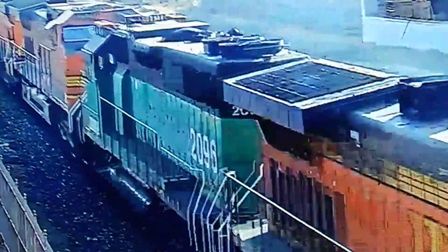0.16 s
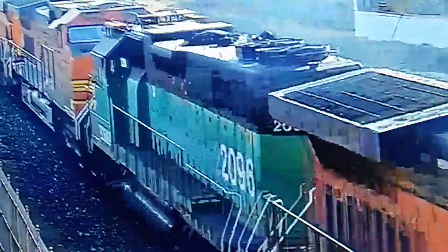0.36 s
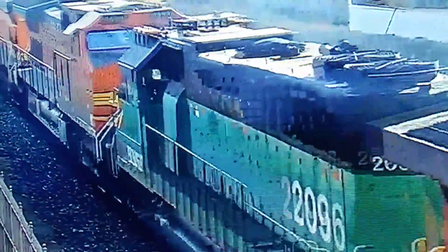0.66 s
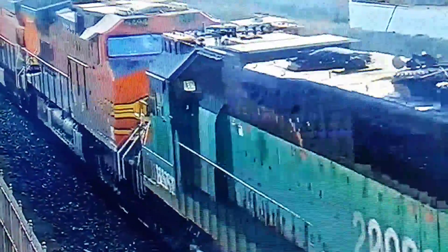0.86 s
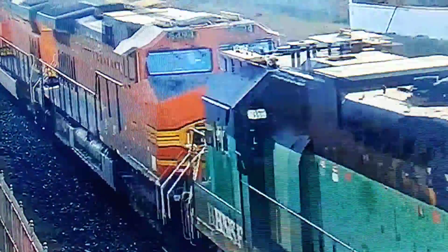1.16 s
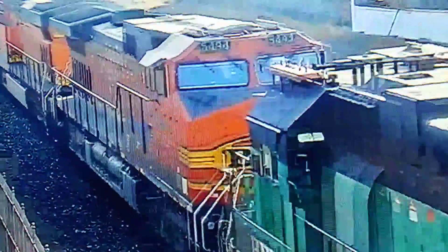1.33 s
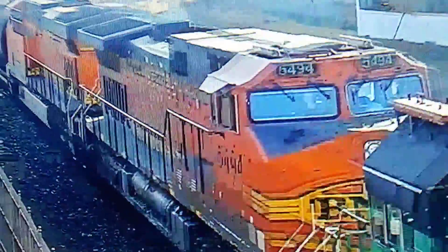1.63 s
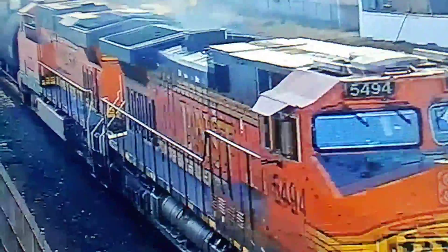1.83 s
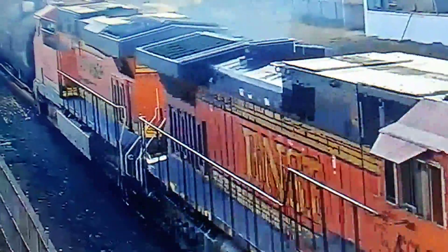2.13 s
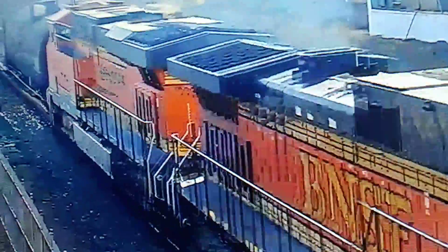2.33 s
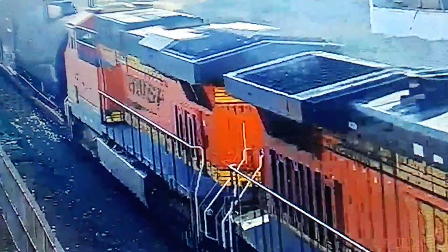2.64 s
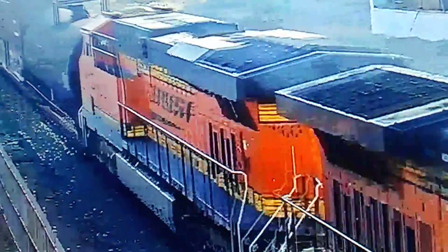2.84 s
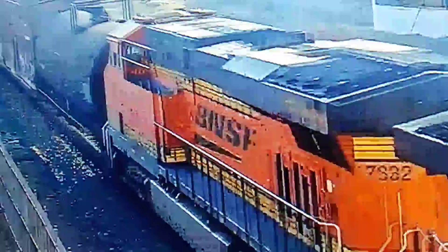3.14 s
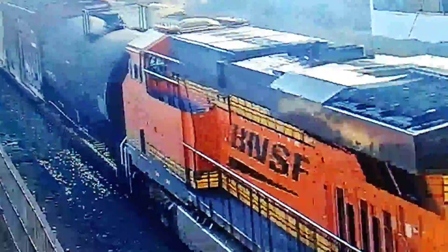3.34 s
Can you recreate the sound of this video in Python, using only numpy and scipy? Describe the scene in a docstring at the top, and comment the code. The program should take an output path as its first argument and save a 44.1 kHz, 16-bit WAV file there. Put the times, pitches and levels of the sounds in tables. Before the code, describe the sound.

Diesel locomotives roar and hiss steadily past as the last air horn echoes fade away

```python
"""The last echoes of an air horn die away while diesel locomotives roll past, heard through a small loudspeaker.
Exhaust rumble, engine roar, steel hiss and rattle are bands of noise; clanks are sudden bursts of the rattle.
The horn is a sum of sine waves with an airy rasp of noise. The loudspeaker's lack of bass is in the noise colours.
Cabinet and room lay narrow peaks, dips and echoes over the train noise; faint microphone noise lies below."""
import sys
import numpy as np
from scipy import signal
from scipy.fft import rfft, irfft
from scipy.io import wavfile

SR = 44100
rng = np.random.default_rng(int(sys.argv[2]) if len(sys.argv) > 2 else 0)


def put_to_file(sound):
    """Save the sound as 16-bit audio at rate SR, in the file named by the first command-line argument."""
    columns = np.atleast_2d(sound).T  # one column per channel
    safe = np.clip(columns, -1, 1)
    whole_steps = np.round(safe * 32767)
    wavfile.write(sys.argv[1], SR, whole_steps.astype(np.int16))


N = 153909   # length in samples

# How loud the passing train is, before the room is added. Each row: start in seconds, exhaust level in dB,
# engine roar level in dB, upper roar level in dB, steel hiss level in dB.
PASSING_LEVELS = [(0, -46, -36.5, -39, -44), (.2, -45, -39, -44, -48.5), (.4, -46.5, -41.5, -48, -48),
                  (.63, -46, -44.5, -49.5, -47), (.85, -45.5, -42, -44.5, -45),
                  (1.2, -46.5, -41.5, -47, -44), (1.5, -46, -41.5, -44.5, -43.5),
                  (1.72, -46.5, -42, -44.5, -44), (1.95, -47, -45, -46, -44.5),
                  (2.23, -47, -44, -49.5, -47), (2.7, -45, -43.5, -47.5, -47), (3.1, -45, -43, -48, -46),
                  (3.3, -46, -41, -47, -44.5), (3.49, -46, -40.5, -44.5, -43.5)]
# Colour of rattling steel and of the horn's rasp. Each row: frequency in Hz, relative strength in dB per Hz.
RATTLE_COLOUR = [(5000, 6.5), (7500, 7.5), (8300, 0), (9800, -4.5), (10400, -1.5), (10900, -5),
                 (11200, -18), (12600, -12), (13500, -20)]


def amp(db):
    """Turn decibels into a gain."""
    return 10 ** (np.asarray(db) / 20)


def rms_one(x):
    """Scale a signal so that its rms (average strength) is 1."""
    return x / np.sqrt(np.mean(x ** 2) + 1e-20)


def in_time(rows):
    """Join the rows of a table with straight lines: one curve per column, one value per sample."""
    seconds, *columns = np.transpose(rows)
    t = np.arange(N) / SR
    return [np.interp(t, seconds, column) for column in columns]


def drift(rate_hz):
    """Random wandering with rms 1: smoothed noise, made at every 40th sample and joined by lines."""
    step = 40
    r = np.exp(-2 * np.pi * rate_hz * step / SR)
    noise = rng.standard_normal(N // step + 2002)
    slow = signal.lfilter([1], [1, -2 * r, r * r], noise)[2000:]   # skip the filter's start
    return np.interp(np.arange(N) / step, np.arange(len(slow)), rms_one(slow))


def coloured(spectrum):
    """Noise with the given spectrum, practically silent outside it; rms 1."""
    hz, db = np.transpose(spectrum)
    grid = np.log(np.fft.rfftfreq(N, 1 / SR) + 1)   # the 1 avoids the log of zero
    gain = amp(np.interp(grid, np.log(hz), db, left=-150, right=-150))
    return rms_one(irfft(rfft(rng.standard_normal(N)) * gain, N))


def darken(roar):
    """The roar darkens with time: its lower part gains level and its upper part loses it."""
    split_hz, tilt_db_per_s = 990, 0.4
    t = np.arange(N) / SR
    spectrum = rfft(roar)
    spectrum[int(split_hz * N / SR):] = 0
    low = irfft(spectrum, N)
    tilt = amp(tilt_db_per_s * (t - t.mean()))
    return low * tilt + (roar - low) / tilt


def engines():
    """Four bands of noise that swell and throb together with the firing cycle, and flicker each alone."""
    # Colours as they leave the loudspeaker. Each row: frequency in Hz, relative strength in dB per Hz.
    exhaust_colour = [(100, -45.5), (160, -28), (232, -6.5), (290, -0.5), (380, -4.5), (440, -11.5),
                      (760, -14), (900, -65)]
    roar_colour = [(700, -23.5), (840, -4), (1070, 1), (1200, 0.5), (1320, 4), (1450, -18), (1600, -26)]
    upper_colour = [(1400, 4.5), (1680, -2), (2060, 3), (2400, -11.5), (3500, -16.5), (4000, -17)]
    hiss_colour = [(3500, -21), (4300, -0.5), (5000, 0.5), (6300, 3.5), (6700, 0.5), (7100, -5),
                   (7500, -21.5), (8200, -47)]
    chug_hz, chug_db = 16, 1.0   # throb of the firing cycle
    swell_hz, swell_db = 6.9, 0.6
    flicker_hz, flicker_db = 14, 0.9
    t = np.arange(N) / SR
    chug = np.sin(2 * np.pi * chug_hz * t + 1.66 * drift(1.0))   # the beat is slightly uneven
    together_db = swell_db * drift(swell_hz) + chug_db * chug
    exhaust = coloured(exhaust_colour)
    roar = darken(coloured(roar_colour))
    upper = coloured(upper_colour)
    hiss = coloured(hiss_colour)
    out = np.zeros(N)
    for db, band in zip(in_time(PASSING_LEVELS), (exhaust, roar, upper, hiss)):
        out += amp(db + together_db + flicker_db * drift(flicker_hz)) * band
    return out


def rattle():
    """Bright steel noise: a flickering bed, and sudden clanks of the running gear that die away."""
    # The clanks. Each row: start in seconds, level in dB before the shared clank gain.
    clanks = [(1.053, -42), (1.1667, -44.5), (1.2895, -37), (1.3508, -47), (1.4944, -41), (1.6496, -42),
              (1.732, -38), (1.8951, -48), (1.9944, -44), (3.0385, -44), (3.273, -41), (3.4201, -43)]
    clank_t60_s, clank_gain_db = 0.24, -16.5   # time to fall by 60 dB, gain shared by all clanks
    bed_db, follows_hiss, flicker_db = -70, 1.6, 6.8   # the bed changes 1.6 dB per dB of hiss
    hits = np.zeros(N)
    for start_s, db in clanks:
        hits[int(start_s * SR)] = amp(2 * (db + clank_gain_db))   # doubled dB: a power
    decay = amp(-120 / (clank_t60_s * SR))   # power kept from one sample to the next
    clank_power = signal.lfilter([1], [1, -decay], hits + 1e-18)
    hiss_db = in_time(PASSING_LEVELS)[3]
    bed = amp(bed_db + follows_hiss * (hiss_db - hiss_db.mean()) + flicker_db * drift(90.0))
    return np.sqrt(clank_power + bed ** 2) * coloured(RATTLE_COLOUR)


def sizzles():
    """Brief sizzle from the wheels: narrow bands of noise under bell-shaped swells."""
    # Each row: middle in seconds, half length in seconds, frequency in Hz, width in Hz, peak level in dB.
    sizzle_rows = [(1.69, 0.073, 5740, 400, -42.5), (3.294, 0.039, 6030, 406, -47.5)]
    t = np.arange(N) / SR
    out = np.zeros(N)
    for middle_s, half_s, hz, width_hz, db in sizzle_rows:
        swell = np.exp(-((t - middle_s) / half_s) ** 2)
        band = coloured([(hz - width_hz / 2, 0), (hz + width_hz / 2, 0)])
        out += amp(db) * swell * band
    return out


def horn():
    """Echoes of a chord: sines whose pitches shift in the late echoes, wavering overtones, a rasp of air."""
    # Level of each strong tone. Each row: start in seconds, low chime level in dB, middle chime level in dB,
    # high chime level in dB, bright overtone level in dB, lower overtone level in dB.
    echo_levels = [(0, -37.5, -34.5, -41, -30, -32.5), (.04, -34.5, -30.5, -53, -41.5, -48.5),
                   (.076, -30, -42, -52, -36, -41), (.12, -43, -30, -43, -32, -43),
                   (.156, -32, -40, -43, -40, -39), (.19, -34, -32, -49, -47, -37.5),
                   (.228, -40, -47, -39, -40.5, -45), (.284, -46, -38, -53, -57, -55.5),
                   (.34, -65, -45.5, -48, -44, -55), (.385, -58, -51, -55, -48, -64),
                   (.425, -62, -39, -69, -55, -50), (.5, -41, -66, -72, -63, -59)]
    # Three chimes and two strong overtones, in the same order. Each row: frequency in Hz,
    # share by which the pitch drops in the late echoes (below zero: it rises).
    chimes = [(324, 0.00018), (402, 0.0315), (497.5, -0.0116), (1208, .036), (1045, 0.034)]
    # Weak overtones. Each row: frequency in Hz, level in dB compared with the lower overtone.
    weak_overtones = [(640, -10.5), (807, -6), (1285, -4.5), (1363, -21)]
    weak_drop, drop_s, drop_width_s = 0.045, 0.168, 0.0076   # drop of weak overtones; when all pitches shift
    waver_db, waver_hz = 2.5, 9
    blare_hz, blare_db, blare_t60_s = 1580, -31.5, 0.2   # a high overtone that fades fast
    rasp_db, rasp_t60_s = -53.5, 0.99
    end_s, fade_s = 0.54, 0.035   # end of the tones; the rasp goes on
    t = np.arange(N) / SR
    levels = in_time(echo_levels)
    is_late = .5 + .5 * np.tanh((t - drop_s) / drop_width_s)   # glides from 0 to 1
    late_time = np.cumsum(is_late) / SR   # seconds spent in the late echoes

    tones = np.zeros(N)
    for (hz, drop), db in zip(chimes, levels):
        phase = 2 * np.pi * hz * (t - drop * late_time) + rng.uniform(0, 2 * np.pi)
        tones += amp(db) * np.sin(phase)
    for hz, db in weak_overtones:
        level = amp(levels[-1] + db + waver_db * drift(waver_hz))
        phase = 2 * np.pi * hz * (t - weak_drop * late_time) + rng.uniform(0, 2 * np.pi)
        tones += level * np.sin(phase + .3 * drift(waver_hz))
    blare = np.sin(2 * np.pi * blare_hz * t + drift(33.0))
    tones += amp(blare_db - 60 * t / blare_t60_s) * blare
    rasp = amp(rasp_db - 60 * t / rasp_t60_s) * coloured(RATTLE_COLOUR)
    fade = np.clip((end_s - t) / fade_s, 0, 1)
    return np.sqrt(2) * tones * fade + rasp   # the root of 2 makes the sine levels rms levels


def peaks_and_dips(x):
    """Resonances of cabinet and room: a chain of narrow filters that each lift or cut one frequency."""
    # Each row: frequency in Hz, lift (above zero) or cut (below zero) in dB.
    resonances = [(345, -5), (376, 4), (473, -9), (497, 6), (570, -9), (715, -7), (829, 7), (927, 5),
                  (958, -12), (1060, -13), (1214, 8), (1238, -9), (1260, -9), (1281, 4), (1335, -9),
                  (1367, 4), (1410, -10), (1470, -12), (1585, -8), (1688, 8), (1838, 10), (1890, -7),
                  (1950, -8), (2022, -9), (2050, 6), (2150, -6), (2217, -10), (2357, -10), (4371, -11),
                  (4468, 4), (5028, 7), (5078, -10), (5124, 8), (5394, -11), (5472, 9), (5598, -9),
                  (5964, 7), (6030, -7), (6072, 7), (6476, 14), (6630, 6), (6668, -11), (6815, -9),
                  (7090, 5), (7181, -10)]
    peak_width_hz, dip_width_hz, wider_hz_per_khz = 26, 20, 3
    sections = []
    for hz, db in resonances:
        w, g = 2 * np.pi * hz / SR, amp(db / 2)
        width_hz = (peak_width_hz if db > 0 else dip_width_hz) + wider_hz_per_khz * hz / 1000
        a = np.pi * width_hz / SR
        top = [1 + a * g, -2 * np.cos(w), 1 - a * g]
        bottom = [1 + a / g, -2 * np.cos(w), 1 - a / g]
        sections.append(np.array(top + bottom) / (1 + a / g))
    return signal.sosfilt(np.array(sections), x)


def room(x):
    """Fixed peaks and dips, then two diffuse echo tails, slowly traded so that ringing tones come and go."""
    t60_s, wet_db = .25, 0   # time to fall by 60 dB, strength of each tail's echo pattern
    trade_hz = .12   # how fast one echo tail is traded for the other
    direct = peaks_and_dips(x)
    t = np.arange(int(.3 * SR)) / SR
    tails = rng.standard_normal((2, len(t))) * amp(-60 * t / t60_s) * (t > .002)
    tails = signal.lfilter([1, -.75], [1], tails)   # the echoes are bright
    tails *= amp(wet_db) / np.sqrt(np.sum(tails ** 2, axis=1, keepdims=True))
    one, other = signal.fftconvolve(direct[None], tails, axes=1)[:, :N]
    turn = 2 * np.pi * trade_hz * np.arange(N) / SR
    return direct + np.cos(turn) * one + np.sin(turn) * other


def microphone_noise():
    """The microphone's own faint, steady noise."""
    # Each row: frequency in Hz, relative strength in dB per Hz.
    floor_colour = [(30, -9), (15700, -8)]
    floor_db = -71.5
    return amp(floor_db) * coloured(floor_colour)


def scene():
    """Train noise through the room, plus horn echoes and microphone noise, as one channel."""
    train = engines() + sizzles() + rattle()
    return (room(train) + horn() + microphone_noise())[None]


def record(dry):
    """Cut the top: a steep low-pass that is 35 dB down from 15800 Hz upward."""
    return signal.sosfilt(signal.cheby2(20, 35, 15800, fs=SR, output="sos"), dry)


dry = scene()
out = record(dry)
put_to_file(out)
```